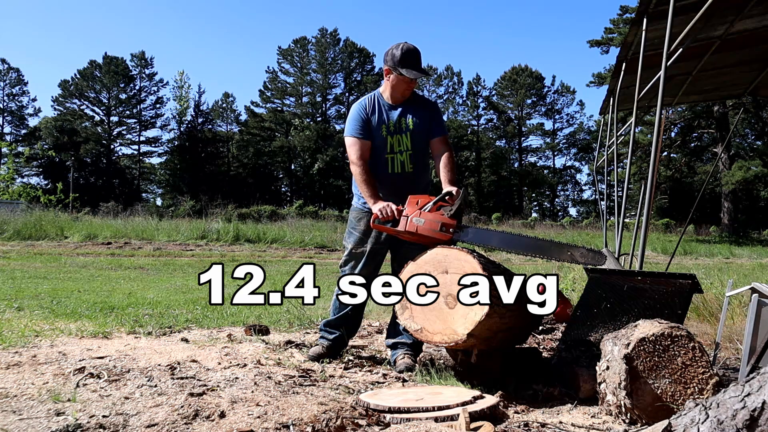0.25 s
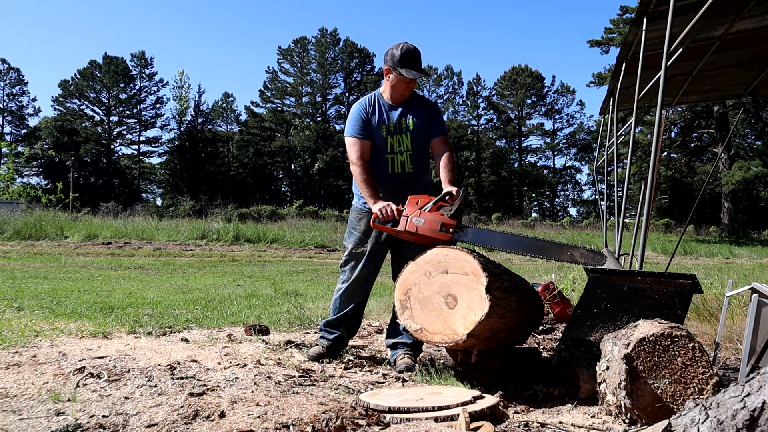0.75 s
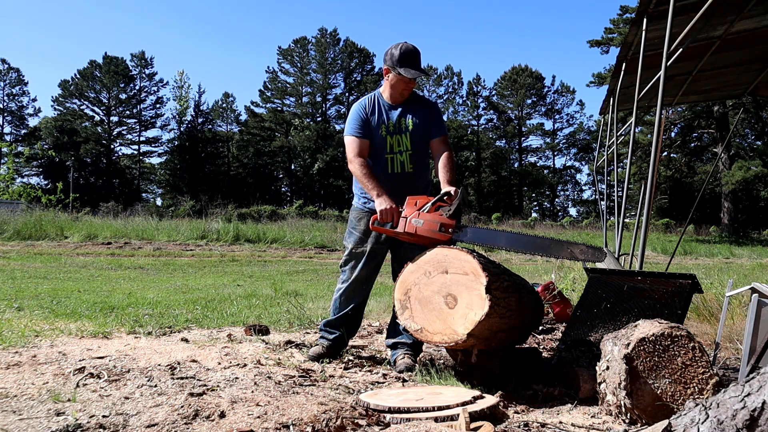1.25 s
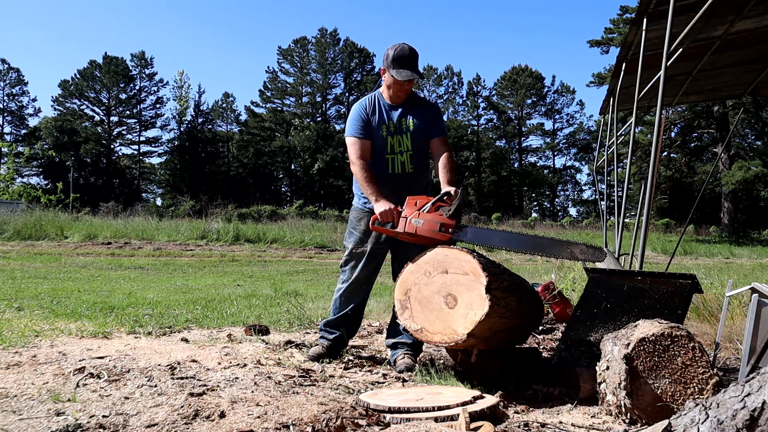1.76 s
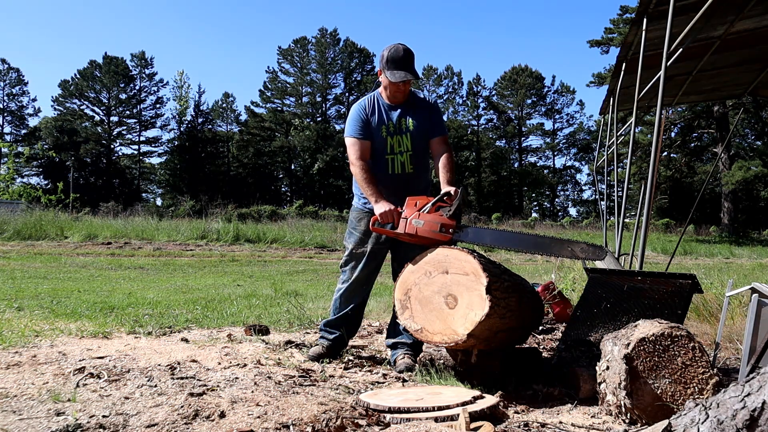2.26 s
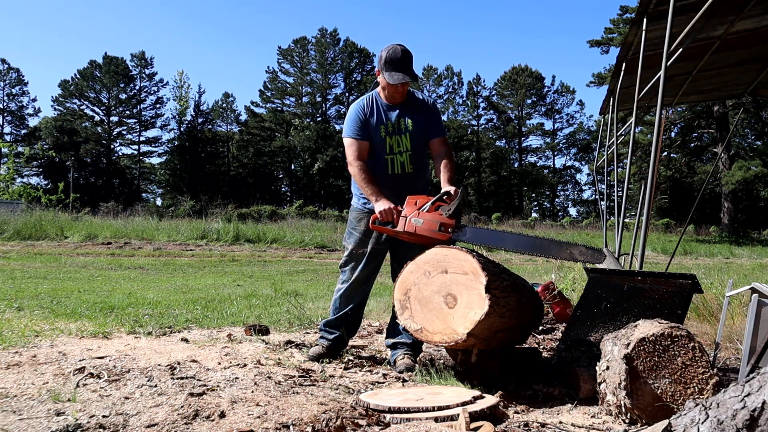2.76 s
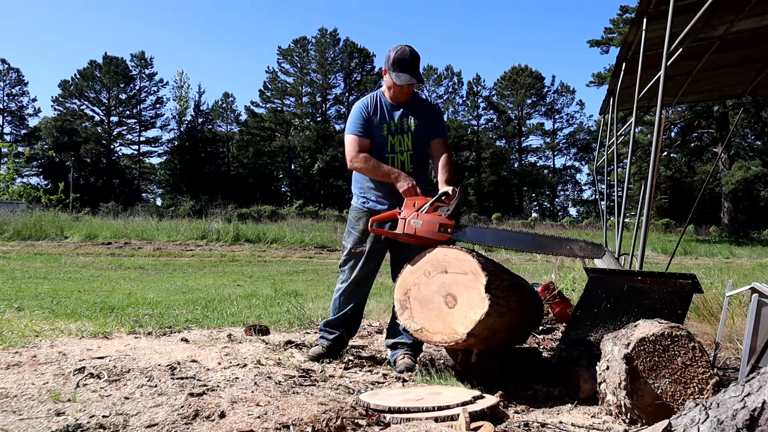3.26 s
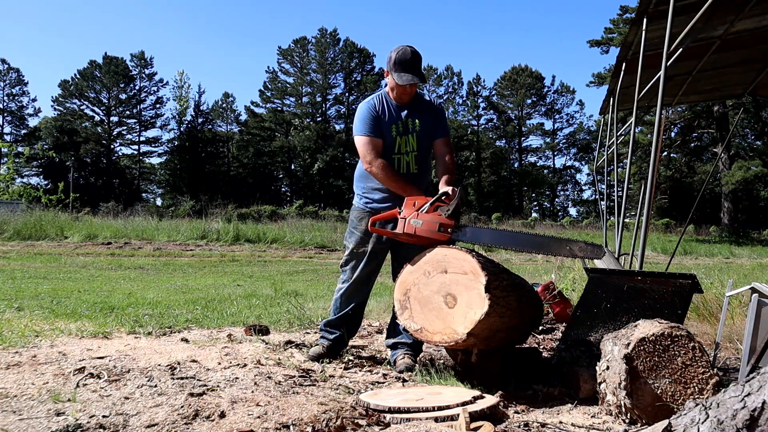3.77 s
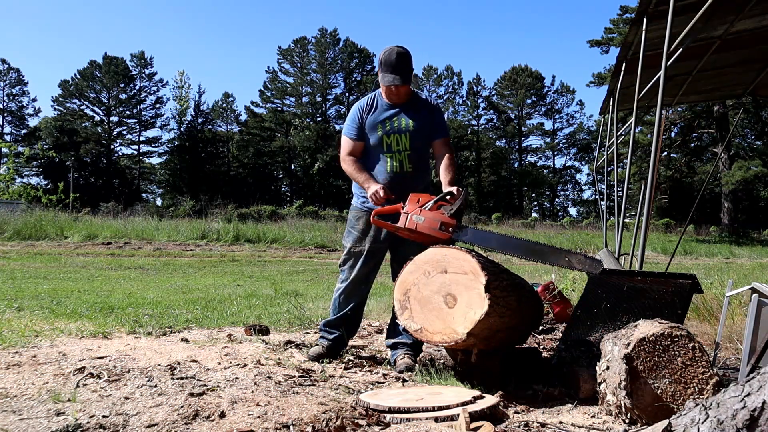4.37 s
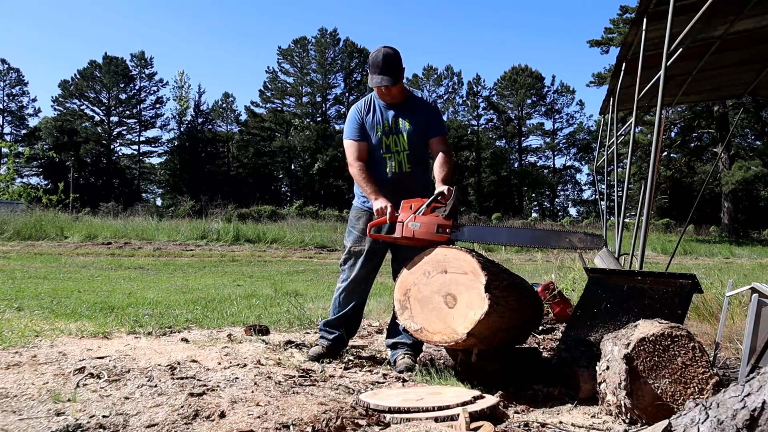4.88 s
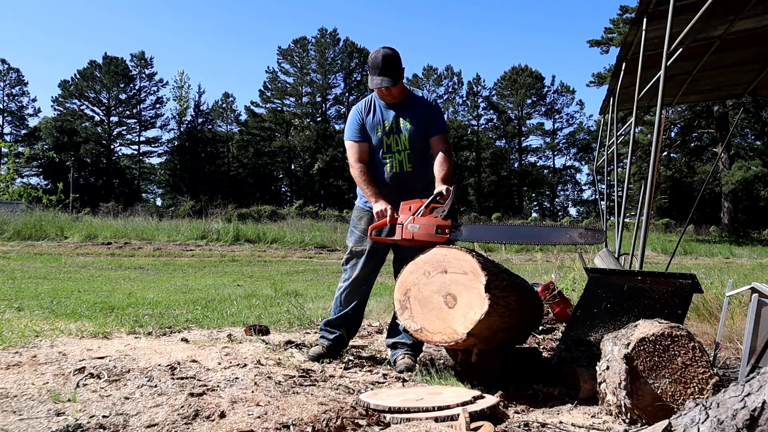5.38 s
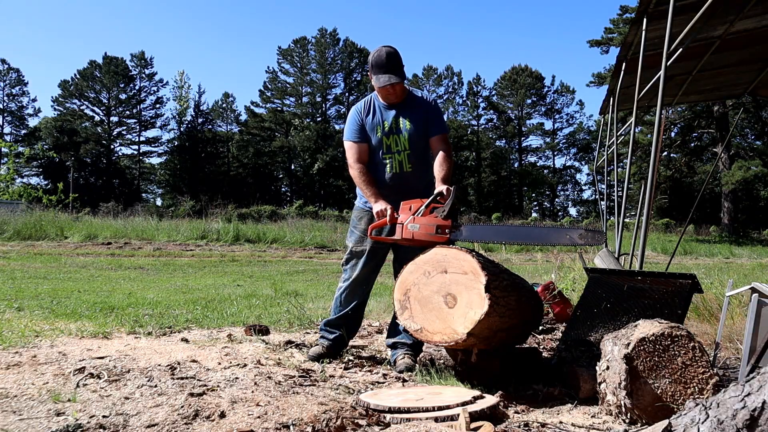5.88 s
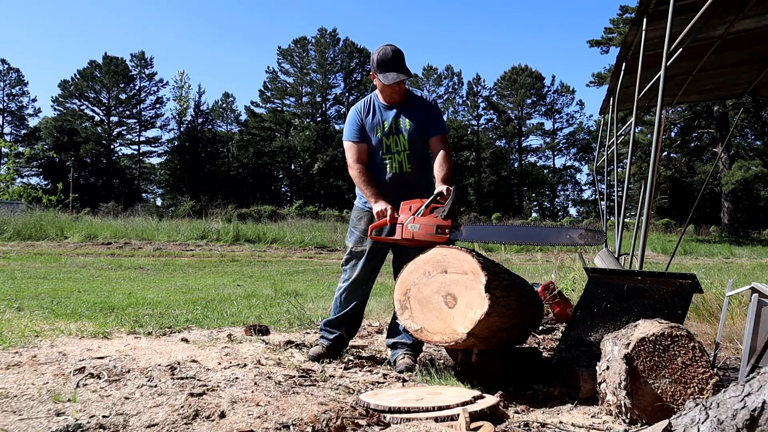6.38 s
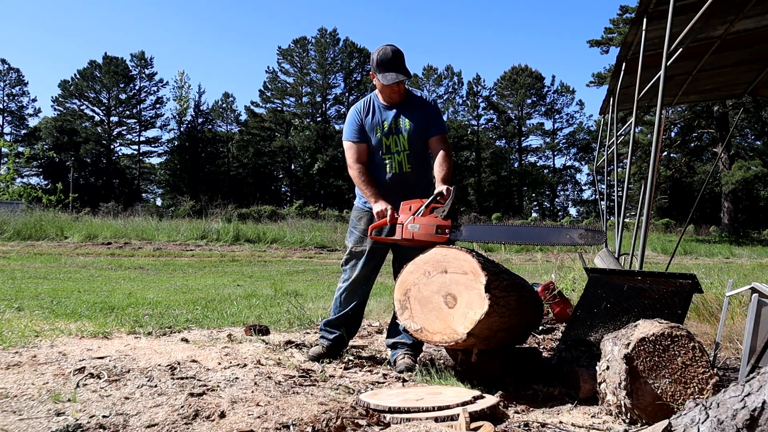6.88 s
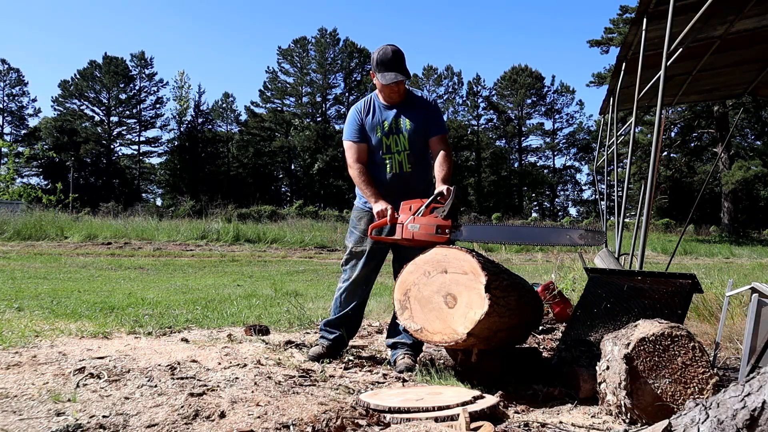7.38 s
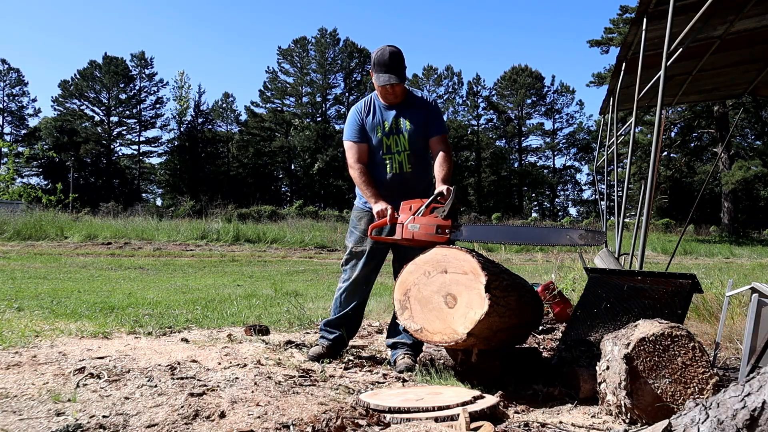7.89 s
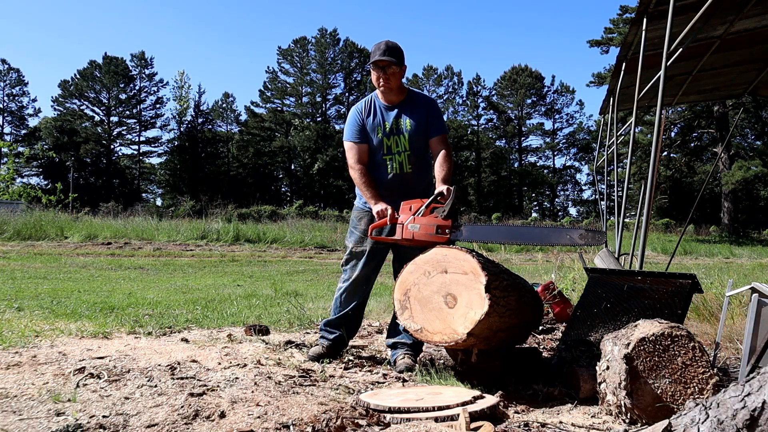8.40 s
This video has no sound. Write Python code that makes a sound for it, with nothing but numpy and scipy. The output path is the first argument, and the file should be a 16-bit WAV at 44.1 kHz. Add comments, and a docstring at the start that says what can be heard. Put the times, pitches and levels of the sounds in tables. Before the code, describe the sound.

A petrol chainsaw idles steadily outdoors, a rough uneven putter with sharp irregular bangs over fast low pumping and a constant metallic rattle.

```python
"""Stereo microphone a few metres from a two-stroke chainsaw idling on a log in the open, among ground, shed and trees.
From the start the crank turns about 53 times a second but the charge fires only every few turns: a bang with a
crack of gas, made of filtered pulses and noise, then soft pumping strokes as the crank slows, some of them popping.
Noise bursts rattle once a turn, and a cover buzzes in four spells up to 7.4 s, by resonators the rattle shakes.
From 0.4 s to 7.4 s the clutch drum rings now and then, as wavering sines; the last firing comes just before the end."""
import sys
import numpy as np
from scipy import signal
from scipy.fft import rfft, irfft
from scipy.io import wavfile
from scipy.ndimage import uniform_filter1d

SR = 44100
rng = np.random.default_rng(int(sys.argv[2]) if len(sys.argv) > 2 else 0)


def log_audio(samples):
    """Write samples as a 16-bit WAV file to the path given in sys.argv[1]."""
    # one column per channel
    frames = np.atleast_2d(samples).T
    # limit to full scale, then quantise
    limited = np.clip(frames, -1, 1)
    pcm = np.round(limited * 32767).astype(np.int16)
    wavfile.write(sys.argv[1], SR, pcm)


N = 381024  # samples in the scene

# Firings of the charge. Each row: time in seconds, strength in relative dB, treble of the gas crack against
# its middle in dB, pitch of a short tone that colours the crack, in Hz.
FIRINGS = [(0.0192, -17, -5, 3300), (0.0946, -11, -5, 2350), (0.2992, -12.5, -4, 7600),
           (0.3725, -10, -4.5, 2400), (0.463, -7.5, -2.5, 1950), (0.5542, -19.5, -5, 1850),
           (0.6088, -12, -4, 6120), (0.699, -11.0, -5, 4000), (0.7887, -11, -9, 8560),
           (0.8608, -22, -3, 2350), (0.935, -25, -3, 2350), (0.9726, -13.5, -5, 2350),
           (1.0449, -9.5, -4, 4400), (1.1343, -11, -2, 3470), (1.281, -21, 8, 7600),
           (1.3754, -12, -1, 9250), (1.4853, -22.0, 1, 7600), (1.542, -24.5, -2, 2350),
           (1.5969, -9.5, -4, 8600), (1.7062, -10.5, -2, 6650), (1.8897, -18.5, 1, 1940),
           (1.9665, -11.5, 1.5, 4170), (2.096, -14, 2, 2360), (2.2505, -26, -3, 1940),
           (2.29, -21.5, 0, 1940), (2.388, -13.5, -2, 4100), (2.521, -22.5, -3, 9040),
           (2.5793, -23.5, -5, 2350), (2.658, -12.5, -5, 5990), (2.7343, -23.5, -2, 2350),
           (2.793, -23.5, -4, 3040), (2.8716, -10.5, -6, 6200), (2.9648, -14.5, -3, 2370),
           (3.0406, -21, -4, 5940), (3.1183, -11, -3, 2300), (3.1928, -11, -6, 9200), (3.323, -20, 1, 3010),
           (3.362, -21, 1, 8590), (3.4584, -20.5, -4, 3230), (3.5174, -7, -0.5, 2360),
           (3.5918, -24.5, -1, 3040), (3.6854, -14, 3, 8700), (3.742, -23, 3, 1840),
           (3.7995, -18, -3, 2400), (3.8755, -16, -6, 3340), (3.9497, -12, -3, 7640),
           (4.0248, -8.5, -1, 8500), (4.131, -11, -1, 3770), (4.2182, -15, -3, 3230),
           (4.2894, -14.5, -1, 9030), (4.38, -11, 0, 3850), (4.4855, -19.5, -1.5, 9000),
           (4.54, -24, 0, 3440), (4.5767, -11.0, -2, 9000), (4.648, -10, 1, 8960), (4.7188, -23.5, 0, 3440),
           (4.7912, -26, 1, 2560), (4.8474, -11, -3, 2000), (4.9395, -24.5, -4, 2350),
           (4.976, -22, -3, 3570), (5.0327, -22.5, 4, 3640), (5.0691, -12, -3, 8860),
           (5.1593, -8.5, -1, 2240), (5.2847, -26.5, -2, 3830), (5.361, -23, -6, 1920),
           (5.474, -22, -4, 3830), (5.513, -20, 6, 2930), (5.5909, -27, -6, 1940), (5.649, -13, -4, 1900),
           (5.7237, -24.5, -5, 1940), (5.801, -21, 1, 1880), (5.8396, -18, -1, 7990),
           (5.8978, -12.5, -5, 7900), (5.973, -19, 0, 1940), (6.0512, -18, 1, 1830), (6.1102, -16, 1, 2820),
           (6.1699, -26.5, -10, 1940), (6.2494, -11, -3, 6100), (6.3246, -9.5, 1, 1970),
           (6.4178, -13.0, -9, 2310), (6.4917, -15.5, 0, 9800), (6.5472, -20.5, 11, 7940),
           (6.6037, -25, -2, 2350), (6.6792, -8.5, 0, 8660), (6.8633, -12, -1, 3780),
           (6.9928, -10.5, 0, 2000), (7.0661, -11.5, 0, 7950), (7.3185, -12, 1, 2360),
           (7.3957, -9.0, -3, 3770), (7.488, -19.5, 11, 9300), (7.621, -11, -5, 5670),
           (7.733, -16.0, -6, 9600), (7.9429, -17, -2, 6000), (8.001, -14.5, 3, 8560),
           (8.1336, -20, 5, 9550), (8.1722, -18.5, -5, 2270), (8.229, -22, -7, 2350),
           (8.3065, -11.5, -1.5, 2280), (8.4813, -20.5, -2, 2810), (8.5411, -11.5, 2, 5300)]
# Muffler response to a full bang. Each row: frequency in Hz, gain in dB.
BANG_MUFFLER = [(43, 5), (68, 10), (93, 22.5), (139, 32), (193, 34.5), (290, 20.5), (335, 32), (502, 21.5),
                (645, 24), (820, 20.5), (1019, 9.5), (1230, 17), (1403, 9.5), (1550, -2.5), (3500, -4.5),
                (7000, -16)]
# Muffler response to a weak pop, also heard in the strokes. Each row: frequency in Hz, gain in dB.
POP_MUFFLER = [(45, -27), (80, -2), (115, 15), (172, 24), (276, 20), (335, 23), (380, 24.5), (445, 26),
               (510, 21), (642, 23), (730, 16.5), (830, 19.5), (890, 17), (935, 6), (980, -9), (1060, -2),
               (1200, -10), (1320, -6), (1500, -14), (3000, -29)]
# Bass tilt of a stroke rich in charge, also heard in the strokes. Each row: frequency in Hz, gain in dB.
RICH_CHARGE = [(60, -4.5), (140, 2), (300, -0.5)]
# Gas noise after a firing. Each row: frequency in Hz, gain in dB.
GAS_CRACK = [(200, -12), (900, 12), (1700, -1.5), (2050, 7.5), (2400, 9), (2750, 6), (3700, 9), (5000, 3),
             (6100, 7), (6900, 3.5), (8600, 10), (11200, -2.5), (13200, 3.5), (14500, -25)]
WEAK_DB, FULL_DB = -26, -10.5  # strength of a firing that is a mere pop, and of a full bang


def firings(thump_db=0.0, crack_db=8.0, tail_db=4.5, tone_db=-10, tone_s=0.0029, crack_lag_s=0.0004,
            width_db=-3.0, lag_s=.0004, pop_lead_s=.0011, split_hz=4700):
    """Each firing thumps the muffler, a weak one like a pop; gas noise cracks, coloured by a brief tone, and trails off."""
    times, strengths, bright_db, tone_hz = np.transpose(FIRINGS)
    opens = times + lag_s
    cracks = times + lag_s + crack_lag_s
    fullness = np.clip((strengths - WEAK_DB) / (FULL_DB - WEAK_DB), 0, 1.1)
    weak_pulses = pulses(opens - pop_lead_s, np.maximum(1 - fullness, 0))
    pops = colour(colour(weak_pulses, RICH_CHARGE), POP_MUFFLER)
    bangs = undb(thump_db) * colour(pulses(opens, fullness), BANG_MUFFLER)
    out = pops - bangs  # a bang pushes the opposite way
    for band, db in (("low", strengths - bright_db / 2), ("high", strengths + bright_db / 2)):
        crack = hiss(cracks, undb(db + crack_db), burst(rise_s=.0004, decay_s=.00065))
        tail = hiss(cracks, undb(db + tail_db), burst(rise_s=.001, decay_s=.005))
        split = signal.butter(4, split_hz, band, fs=SR, output="sos")
        out = out + signal.sosfilt(split, colour(crack + tail, GAS_CRACK))
    out = out + pings(cracks, tone_hz, undb(strengths + tone_db), tone_s)
    # the crack glances off the log and reaches each side differently
    glance = hiss(cracks, undb(strengths + width_db), burst(rise_s=0.00055, decay_s=0.00086))
    return out + sideways(colour(glance, GAS_CRACK))


# Muffler response to a pumping stroke. Each row: frequency in Hz, gain in dB.
PUMP_MUFFLER = [(45, -27), (80, -1), (122, 13.5), (180, 23.5), (225, 25), (290, 24.5), (335, 24),
                (410, 26.3), (455, 23), (516, 10), (580, 16.5), (650, 15.5), (714, 8), (825, 12), (900, 8),
                (970, -2), (1050, -8), (1300, -8), (1500, -14), (3000, -27)]
IDLE_HZ = 53.3  # turns per second
# a slower crank takes in more charge per turn: strokes grow louder and pop more (per Hz under idle speed)
PUMP_DB_PER_HZ, POP_SHARE_PER_HZ = 0.13, 0.21
POP_SHARE = 0.8  # mean share of a ripe stroke that pops at idle speed, before scatter and limits


def strokes(times, ripe, heavy, pump_db=0, pop_db=0, lag_s=0.0001, pop_lead_s=0.00045, scatter_db=0.1,
            burn_scatter=0.42, heavy_burn=0.28):
    """Unfired turns pump the muffler evenly; once charge has gathered, part burns and the stroke pops a little early."""
    sag_hz = IDLE_HZ - speed(times)
    size_chance, burn_chance = rng.standard_normal((len(times), 2)).T
    sizes = undb(PUMP_DB_PER_HZ * sag_hz + scatter_db * size_chance)
    usual_burn = np.where(heavy, heavy_burn, POP_SHARE) + POP_SHARE_PER_HZ * sag_hz
    burn = ripe * np.clip(usual_burn + burn_scatter * burn_chance, 0, 1)
    opens = times + lag_s - pop_lead_s * burn

    def puffs(share):
        """Pulses at the port, those heavy with charge tilted in the bass."""
        plain = pulses(opens, sizes * share * ~heavy)
        rich = pulses(opens, sizes * share * heavy)
        return plain + colour(rich, RICH_CHARGE)

    pumping = undb(pump_db) * colour(puffs(1 - burn), PUMP_MUFFLER)
    popping = undb(pop_db) * colour(puffs(burn), POP_MUFFLER)
    return pumping + popping + air_box(opens, sizes)


def air_box(times, sizes, hz=316, t60_s=0.12, db=-30, lag_s=0.00639, scatter_db=0.3):
    """A third of a turn later the carburettor gulps, unevenly, and the air box rings through the gap between strokes."""
    t = np.arange(SR // 4) / SR
    gulps = pulses(times + lag_s, sizes * undb(scatter_db * rng.standard_normal(len(times))))
    ring = undb(db - 60 * t / t60_s) * np.sin(2 * np.pi * hz * t)
    return through(gulps, ring)


def smear(x, corner_hz=160):
    """An all-pass: the bass leaves the muffler a little after the treble, so each putt falls in pitch."""
    g = np.tan(np.pi * corner_hz / SR)
    pole = (1 - g) / (1 + g)
    return signal.lfilter([pole, -1], [1, -pole], x)


def crank(slowing=.003, jitter=0.004, run_on_s=0.15, count=2, size=5):
    """Port openings between firings, every turn a little slower but for jitter, with their state of charge."""
    starts = np.transpose(FIRINGS)[0]
    ends = np.append(starts[1:], starts[-1] + run_on_s)
    times, ripe, heavy = [], [], []
    for start, end in zip(starts, ends):
        turns = (end - start) * speed(np.linspace(start, end)).mean()
        age = np.arange(1, max(round(turns), 1) + 1)
        elapsed = np.cumsum(1 + slowing * age + jitter * rng.standard_normal(len(age)))
        times.append(start + (end - start) * elapsed[:-1] / elapsed[-1])
        # in each round of `size` turns the first `count` only scavenge, the rest are ripe to pop
        ripe.append((age[:-1] - 1) % size >= count)
        # the last turn before the next firing is heavy with unburnt charge
        heavy.append(age[:-1] == len(age) - 1)
    return np.concatenate(times), np.concatenate(ripe), np.concatenate(heavy)


# Crank speed. Each row: time in seconds, speed in turns per second.
CRANK_SPEED = [(0.0, 51.4), (0.12, 53.3), (0.41, 54.4), (1.73, 54.3), (2.16, 52.3), (3.32, 52.3),
               (3.95, 53.7), (4.09, 55.3), (5.17, 55.2), (5.39, 52.6), (6.18, 51.4), (6.38, 53.3),
               (6.66, 53.4), (8.64, 51.4)]


def speed(times):
    """Turns of the crank per second at these times, drifting in straight lines."""
    return np.interp(times, *np.transpose(CRANK_SPEED))


# Rattle of piston, fan and casing. Each row: frequency in Hz, gain in dB.
RATTLE_COLOUR = [(40, -16.5), (75, -6), (120, 8.5), (200, 16.5), (500, 6), (820, 4), (960, 3), (1100, 2.5),
                 (1450, -2.5), (1620, -1), (2150, -2.5), (3700, -3.5), (4080, -8.5), (4600, -9.5),
                 (6900, -9.5), (8500, -6.5), (10800, -17.5), (13500, -21)]
# Casing resonances. Each row: frequency in Hz, width in Hz, level in relative dB.
CASING_MODES = [(1925, 58, 11), (1600, 130, -6), (2230, 140, -7), (2583, 45, -3), (3042, 65, -2),
                (3400, 150, -6), (6468, 25, -9), (9076, 50, -8)]
# How the casing's ring rises and falls. Each row: time in seconds, level in relative dB.
CASING_LEVEL = [(0, 3), (1.7, 0), (1.85, 0), (2.15, -2.5), (2.3, 2.5), (3.1, 1), (3.3, -1.5), (3.6, -1),
                (3.8, 2), (4.7, 0.5), (4.9, -6), (5.1, 0.5), (5.35, -2), (5.8, 1), (8.64, 2.5)]


def rattle(times, slap_db=0.28, whirr_db=-32, tick_db=-10, casing_db=-2, width_db=-39, lead_s=0.007,
           scatter_db=0.97, tick_scatter_db=4.0, tick_lead_s=0.0035, db_per_hz=0.07):
    """The piston slaps just before each port opening and small parts tick, over the even whirr of the fan."""
    slap_chance, time_chance, tick_chance = rng.standard_normal((len(times), 3)).T
    slap_sizes = undb(slap_db + scatter_db * slap_chance)
    slap = hiss(times - lead_s, slap_sizes, burst(rise_s=0.0047, decay_s=0.0051))
    tick_times = times - tick_lead_s + 0.00046 * time_chance
    tick_sizes = undb(tick_db + tick_scatter_db * tick_chance)
    ticks = hiss(tick_times, tick_sizes, burst(rise_s=.0001, decay_s=0.00081))
    whirr = undb(whirr_db) * rng.standard_normal(N)
    t = np.arange(N) / SR
    shake = (slap + ticks + whirr) * undb(db_per_hz * (speed(t) - IDLE_HZ))
    casing = sum(undb(db) * resonate(shake, hz, width) for hz, width, db in CASING_MODES)
    casing = undb(casing_db + np.interp(t, *np.transpose(CASING_LEVEL))) * casing
    spread = sideways(colour(undb(width_db) * rng.standard_normal(N), RATTLE_COLOUR))
    return colour(shake, RATTLE_COLOUR) + casing + covers(shake) + loose_parts(times) + spread


# Spells in which a cover buzzes. Each row: start in seconds, end in seconds, frequency in Hz, width in Hz,
# level in relative dB.
COVER_BUZZES = [(0, 1.3, 2630, 35, -3), (1.6, 4.7, 3470, 70, 2), (2.75, 4.7, 3050, 40, 3),
                (5.15, 7.4, 3770, 130, 0)]


def covers(shake, fade_s=.2):
    """Loose covers, resonators driven by the shaking, buzz for a while as the grip on the saw shifts."""
    t = np.arange(N) / SR
    out = 0
    for start, end, hz, width, db in COVER_BUZZES:
        fade = np.clip(np.minimum(t - start, end - t) / fade_s + .5, 0, 1)
        out = out + undb(db) * fade * resonate(shake, hz, width, drift=0.00299)
    return out


def loose_parts(times, db=-32, scatter_db=1.5, lead_s=.0033, spread_s=.0008, hz=3000, octaves=0.36,
                ring_s=0.00088, count=2):
    """As the piston changes sides, chain and small parts click on bar and case, each time at another pitch."""
    pitch_chance, time_chance, size_chance = rng.standard_normal((len(times) * count, 3)).T
    pitch = np.clip(hz * 2 ** (octaves * pitch_chance), 1000, 9000)
    clicks = np.repeat(times, count) - lead_s + spread_s * time_chance
    return pings(clicks, pitch, undb(db + scatter_db * np.minimum(size_chance, 2)), ring_s)


# Clutch shoes catching the drum. Each row: time in seconds, low mode and high mode each in dB against the mode's
# own level, free ringing in seconds.
DRUM_TAPS = [(.373, -14, 17, .1), (0.698, -2, -8, .17), (1.046, -1, 13, .08), (1.16, 2, -12, .22),
             (1.707, -8, -15, .2), (1.967, -5, -15, 0.13), (4.024, 2.5, -4, 0.11), (4.132, -14, 16, .04),
             (4.178, 1.5, -6, 0.17), (4.38, -9, 16, 0.055), (4.575, -1, -8, .07), (4.65, 3.5, 12, .22),
             (5.16, 2, -6, .3), (6.679, 1, 8, .2), (7.395, -6, -10, .15)]
# Modes of the steel drum. Each row: frequency in Hz, level in dB, free decay by 60 dB in seconds.
DRUM_MODES = [(4058, -39, 1.5), (9076, -52, .4)]


def clutch_drum(touch_db=-7, touch_s=.09, waver_db=3.0, waver_rate=32, waver_hz=2.7):
    """The drum rings freely after a tap, until a shoe brushes off part of the ring; it wavers as the saw shakes."""
    out = 0
    t = np.arange(N) / SR
    age = np.arange(SR) / SR
    for mode, (hz, gain_db, t60) in enumerate(DRUM_MODES):
        power = 0
        for start, *mode_db, free_s in DRUM_TAPS:
            brushed_db = touch_db * np.clip((age - free_s) / touch_s, 0, 1)
            db = mode_db[mode] + gain_db - 60 * age / t60 + brushed_db
            power = power + pulses(round(start * SR) / SR + age, undb(db) ** 2)
        phase = 2 * np.pi * (hz * t + np.cumsum(waver_hz * walk(waver_rate)) / SR)
        out = out + np.sqrt(power) * undb(waver_db * walk(waver_rate)) * np.sin(phase)
    return out


# Sound scattered by ground, shed and trees. Each row: frequency in Hz, gain in dB against the direct sound.
YARD_SCATTER = [(60, -17), (200, -29), (400, -26), (800, -18), (2000, -16), (6000, -15), (13000, -11)]


def yard(x, t60_s=0.16):
    """Open ground gives only a faint spray of reflections, decaying noise that differs on each side."""
    t = np.arange(SR // 2) / SR
    spray = rng.standard_normal((2, len(t))) * np.exp(-np.log(1000) * t / t60_s)
    spray /= np.linalg.norm(spray, axis=1, keepdims=True)
    scattered = colour(x.mean(axis=0), YARD_SCATTER)
    return x + np.array([through(scattered, side) for side in spray])


def sideways(x, corner_hz=2500):
    """The part that differs between left and right, opposite in sign: mostly treble."""
    treble = signal.sosfilt(signal.butter(1, corner_hz, "high", fs=SR, output="sos"), x)
    return np.outer([1, -1], treble)


def resonate(x, hz, width_hz, drift=.003, drift_rate=7):
    """A panel rings with its own noise, as strongly as x shakes it; its centre wanders by a small share."""
    pole = np.exp(-np.pi * width_hz / SR)
    noise = x * rng.choice([-1., 1.], N)
    ring = signal.lfilter([2 * (1 - pole)], [1, -pole * np.exp(2j * np.pi * hz / SR)], noise)
    wander = 2 * np.pi * np.cumsum(hz * drift * walk(drift_rate)) / SR
    return np.abs(ring) * np.cos(np.angle(ring) + wander)


def pings(times, hz, sizes, decay_s):
    """A short decaying sine at each time, each with its own pitch and size."""
    t = np.arange(SR // 50) / SR
    rings = np.sin(2 * np.pi * np.outer(hz, t)) * np.exp(-t / decay_s) * sizes[:, None]
    sample_times = np.round(times * SR)[:, None] / SR + t
    return pulses(sample_times.ravel(), rings.ravel())


def burst(rise_s, decay_s, size=4096):
    """A power envelope of unit sum that swells and dies."""
    t = np.arange(size) / SR
    shape = (1 - np.exp(-t / rise_s)) ** 2 * np.exp(-t / decay_s)
    return shape / shape.sum()


def hiss(times, sizes, envelope):
    """Noise in bursts, one for each time; overlapping bursts add in power."""
    power = np.abs(through(pulses(times, sizes ** 2), envelope))
    return np.sqrt(power) * rng.standard_normal(N)


def pulses(times, sizes):
    """One impulse of the given size at each time within the scene."""
    at = np.round(times * SR).astype(int)
    inside = (at >= 0) & (at < N)
    return np.bincount(at[inside], sizes[inside], N)


def walk(rate):
    """Random levels held 1 / rate s and slewed twice; spread near 1."""
    k = int(SR / rate)
    steps = np.repeat(rng.standard_normal(N // k + 1), k)
    return 1.3 * uniform_filter1d(uniform_filter1d(steps, k), k)[:N]


def colour(x, points, size=4096):
    """Causal filter with the gain of (Hz, dB) points: it rings after a pulse, never before."""
    hz, db = np.transpose(points)
    grid = np.maximum(np.fft.rfftfreq(size, 1 / SR), 1)
    gain = undb(np.interp(np.log(grid), np.log(hz), db))
    # folding the cepstrum forward in time gives minimum phase
    cepstrum = irfft(np.log(gain))
    cepstrum[1:size // 2] *= 2
    cepstrum[size // 2 + 1:] = 0
    return through(x, irfft(np.exp(rfft(cepstrum))))


def through(x, response):
    """Convolution, cut to the length of the scene."""
    return signal.fftconvolve(x, response)[:N]


def undb(db):
    """Amplitude factor of a level in dB."""
    return 10 ** (np.asarray(db) / 20)


def scene():
    """Exhaust and machinery of the idling saw, in the yard."""
    times, ripe, heavy = crank()
    exhaust = smear(firings() + strokes(times, ripe, heavy))
    every_turn = np.append(times, np.transpose(FIRINGS)[0])
    return yard(exhaust + rattle(every_turn) + clutch_drum())


# Right microphone against the left. Each row: frequency in Hz, gain in dB.
RIGHT_MICROPHONE = [(200, 0), (1200, .5), (9000, .7), (13000, 2)]
TOP_HZ = 14200  # the top is cut above this


def record(dry, low_cut_hz=50):
    """A stereo microphone with a low cut, slightly brighter on the right; full scale stops the peaks, the top is cut."""
    sides = [dry[0], colour(dry[1], RIGHT_MICROPHONE)]
    heard = signal.sosfilt(signal.butter(2, low_cut_hz, "high", fs=SR, output="sos"), sides)
    top_cut = signal.ellip(8, .2, 70, TOP_HZ, fs=SR, output="sos")
    return signal.sosfilt(top_cut, np.clip(heard, -1, 1))


dry = scene()
out = record(dry)
log_audio(out)
```